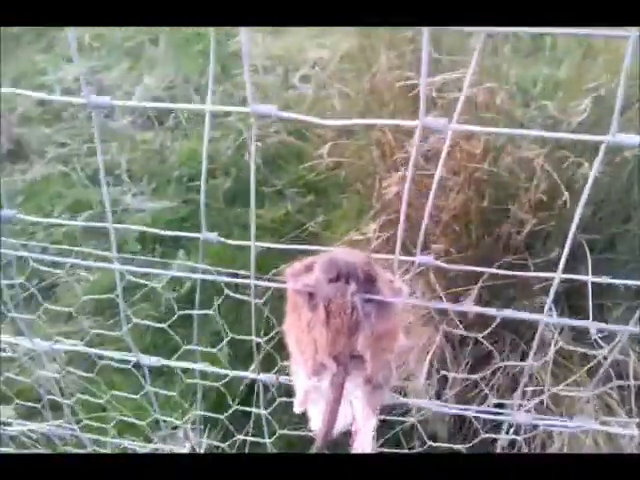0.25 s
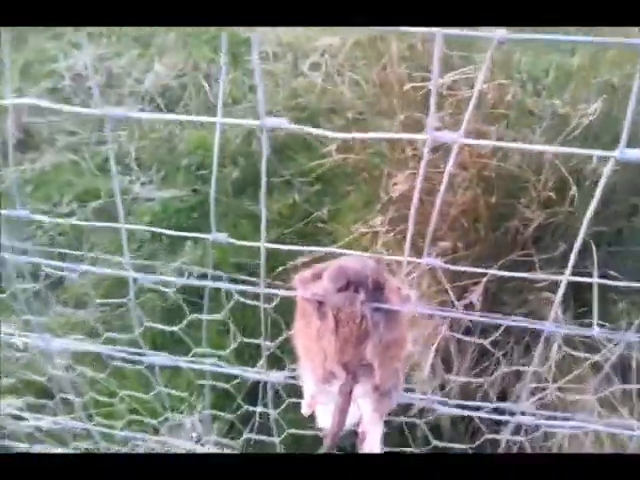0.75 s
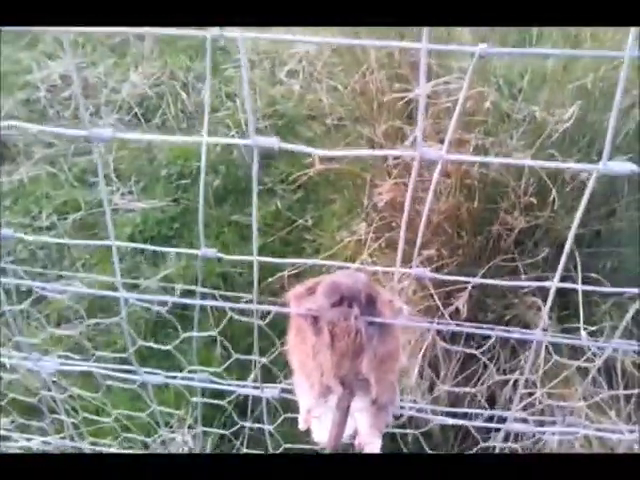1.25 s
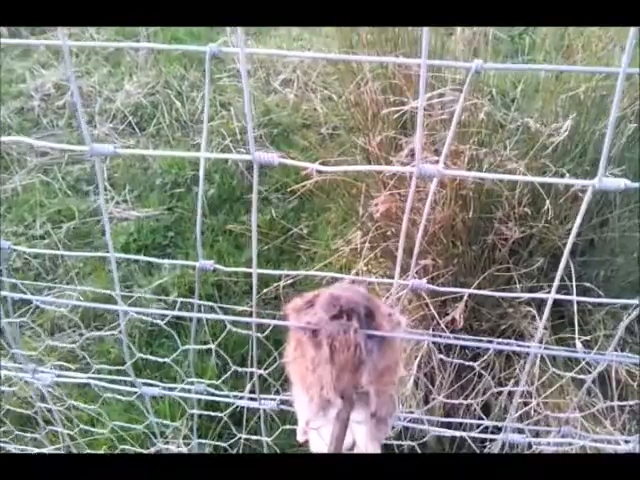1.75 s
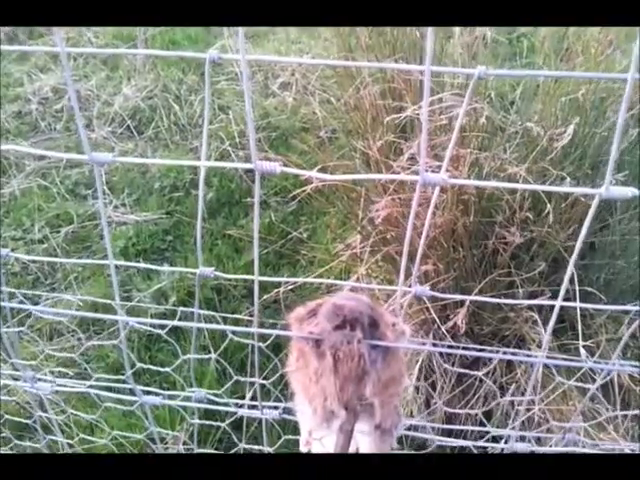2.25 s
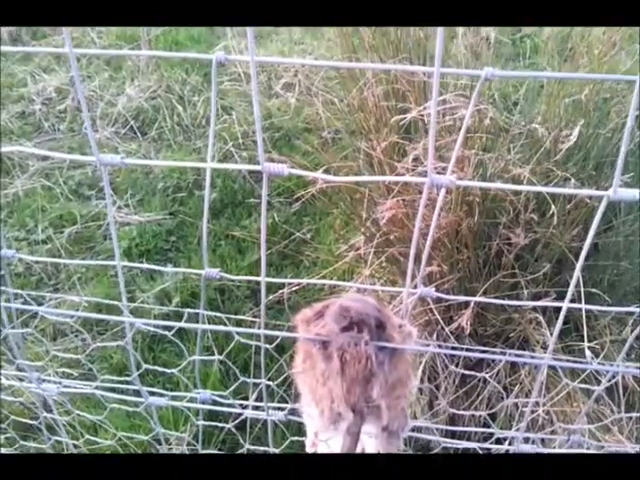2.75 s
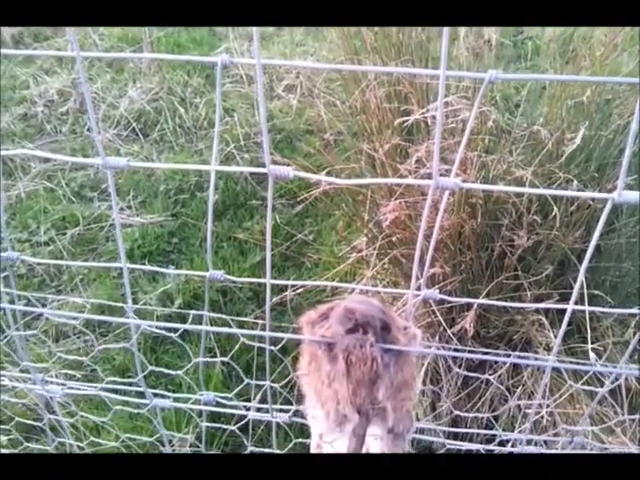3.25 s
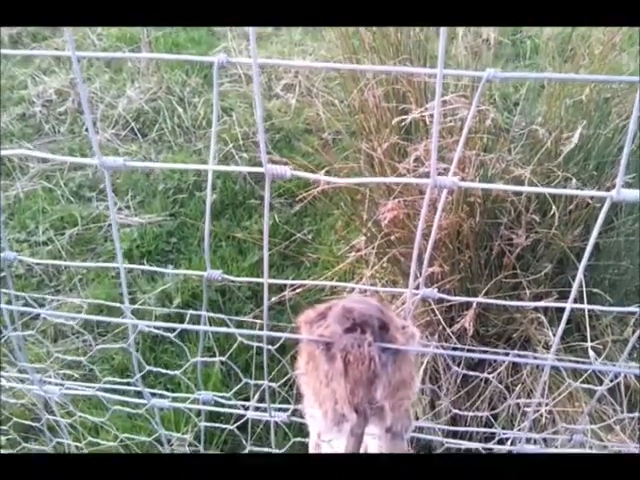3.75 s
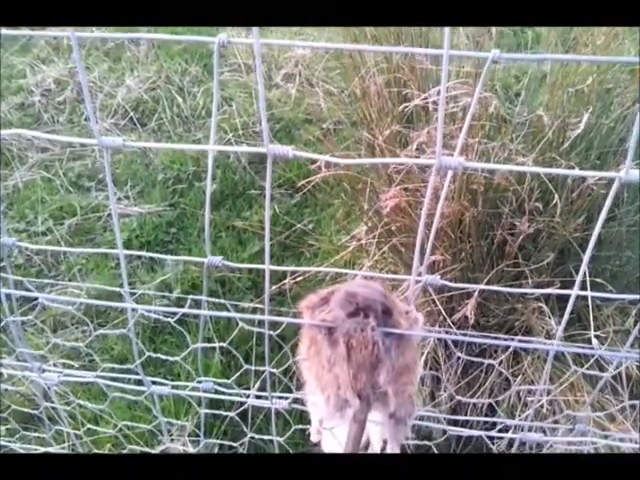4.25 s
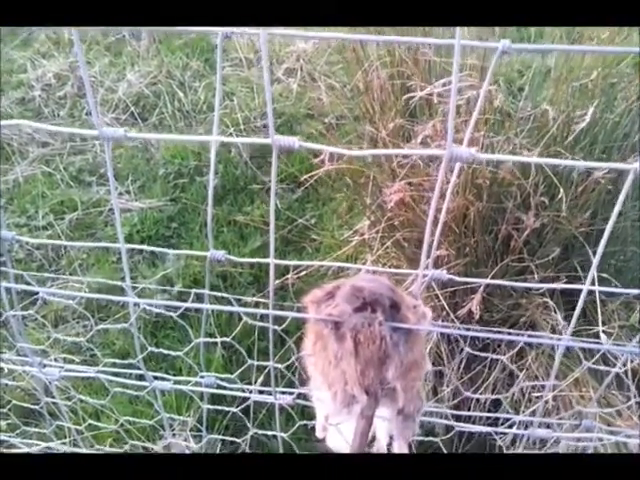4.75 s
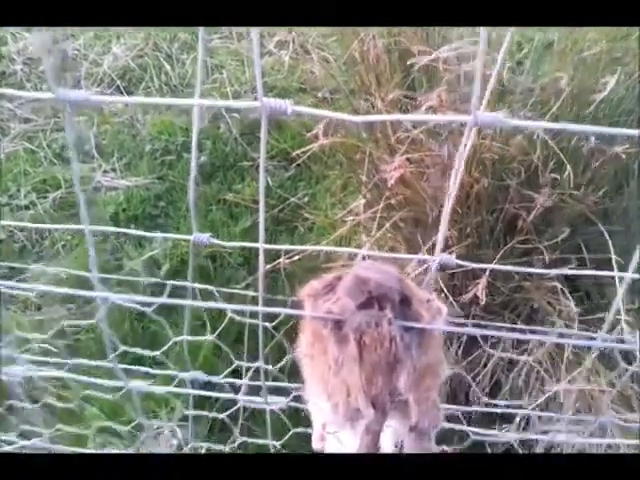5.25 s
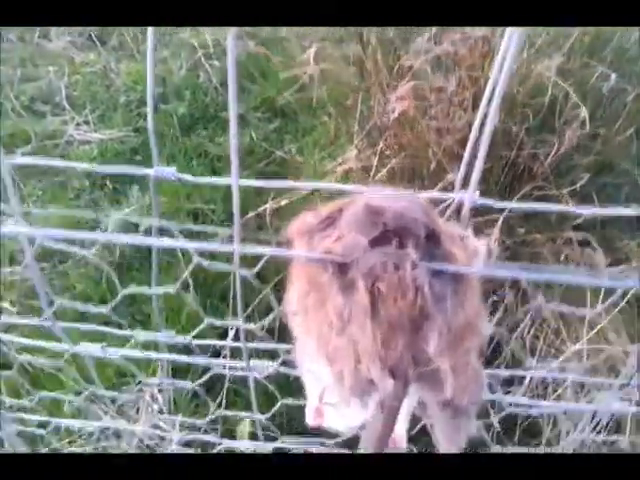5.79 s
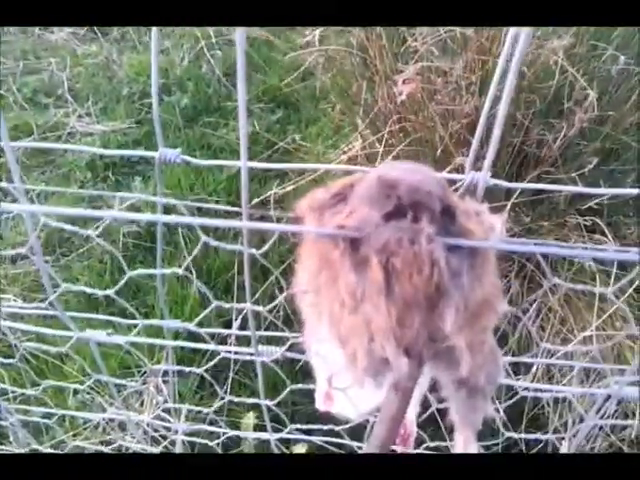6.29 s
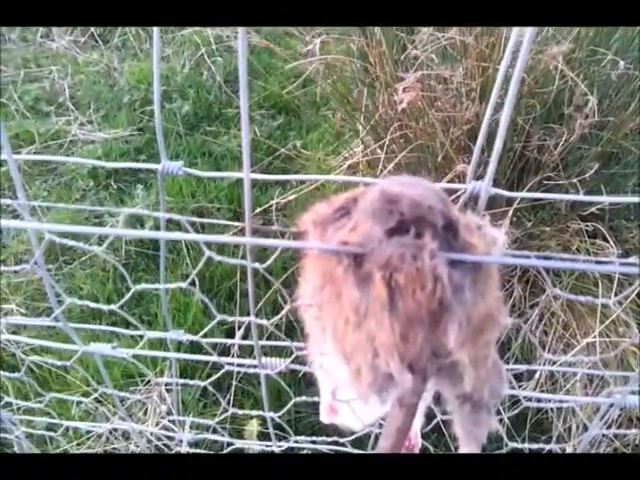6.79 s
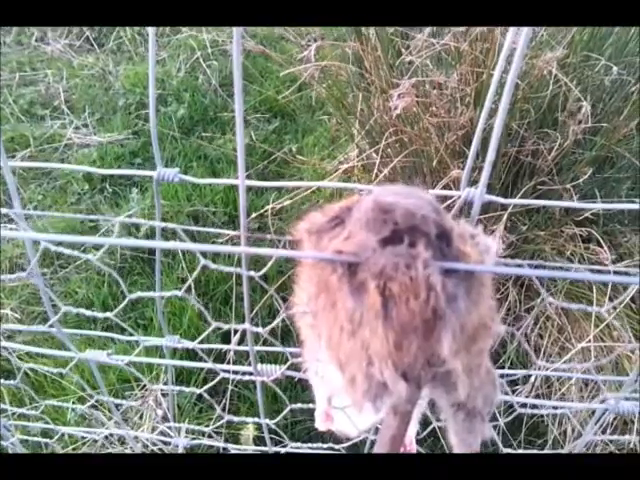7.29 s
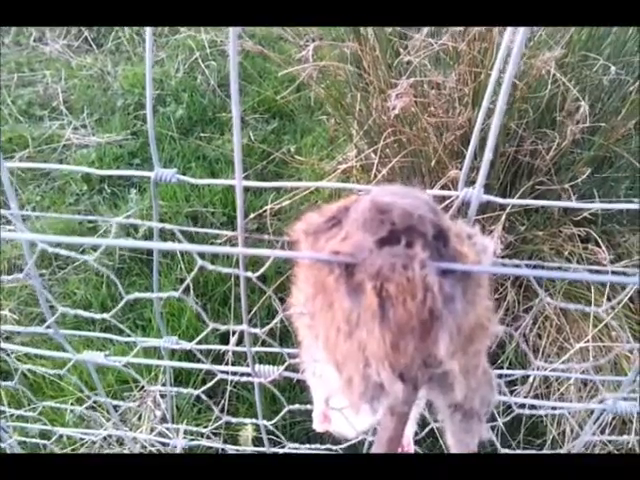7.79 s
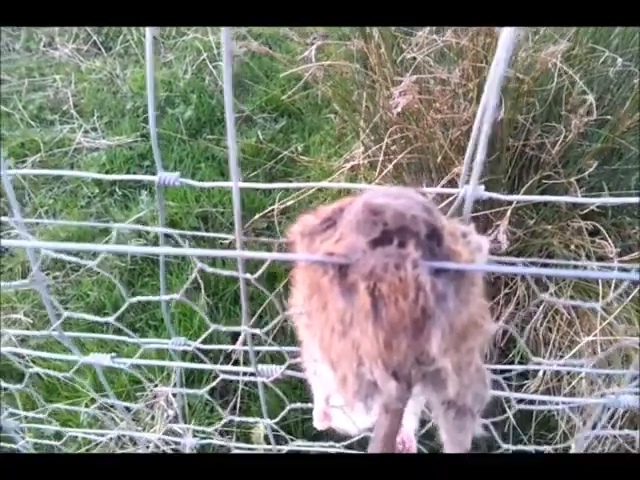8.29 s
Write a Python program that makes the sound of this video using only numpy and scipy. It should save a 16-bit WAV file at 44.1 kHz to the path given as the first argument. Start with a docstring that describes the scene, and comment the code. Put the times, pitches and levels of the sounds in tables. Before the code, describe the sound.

An electric fence snaps loudly five times, about every second and a half, over faint outdoor rumble, with grass rustling and a spell of wind buffeting.

```python
"""Electric fence snapping in a meadow

An electric fence arcs every second and a half, close to a small microphone whose input it overloads.
Each snap is shaped noise: a crackle, a ground echo, echoes off posts, and a low kick of the microphone.
Wind buffets the microphone port for a while: rumbling noise with short fluttering packets on top.
Grass rustles, mostly at the start, as grainy hiss with a few cracks.
Steady coloured noise makes the far rumble and hiss under it all."""
import sys
import numpy as np
from scipy import signal
from scipy.fft import rfft, irfft, next_fast_len
from scipy.io import wavfile
from scipy.ndimage import map_coordinates

SR = 44100
rng = np.random.default_rng(int(sys.argv[2]) if len(sys.argv) > 2 else 0)


def bounce(signal):
    """Save signal as a 16-bit WAV file at the path given by the first command-line argument."""
    frames = np.transpose(np.atleast_2d(signal))
    limited = np.clip(frames, -1, 1)
    pcm = np.round(limited * 32767).astype(np.int16)
    wavfile.write(sys.argv[1], SR, pcm)


N = 376173  # length in samples


def sparks():
    """Each arc is a sudden bang, scattered by wires, posts and meadow, that also jolts the diaphragm."""
    # the snaps; crackle levels are before the fades below, kick and swing are signed sizes, and
    # share_new says how far the surroundings' answer has changed:
    # start_s, high_crackle_db, low_crackle_db, loud_part_s, kick, swing_back, share_new (0-1)
    spark_rows = [(1.3754, -3, -9, 0.015, -0.16, 0.018, 0.033),
                  (2.8915, -5.5, -10.5, 0.014, -0.64, 0.092, 0.17),
                  (4.4032, -6.5, -10, .015, -0.85, 0.11, 0.27), (5.9222, -10, -8, 0.013, -0.4, .05, 0.8),
                  (7.4379, -5, -9, 0.013, 0.93, -0.13, 1)]
    # colour of the near crackle, treble and bass parts: pitch_hz, relative level_db (per Hz)
    near_high = [(3500, -56.5), (4400, -14), (5150, 0.5), (5350, -3.5), (5900, 0.5), (6150, -2.5),
                 (6380, 1), (7000, -7), (7600, -7), (9000, -20)]
    near_low = [(150, -29.5), (450, -13.5), (900, -12), (1400, -3.5), (1550, -3.5), (1880, 2), (2200, -9),
                (2450, -1), (2950, -7), (3330, -3), (3800, -9), (4400, -6), (5500, -60)]
    # smoother colours of the far scatter: pitch_hz, relative level_db (per Hz)
    far_high = [(3200, -40.5), (4300, -8.5), (5000, -2.5), (6400, -2), (7600, -6.5), (9000, -20)]
    far_low = [(150, -29.5), (500, -14), (1200, -5), (2000, -2), (3300, -4), (4300, -7.5), (5500, -50)]
    out = np.zeros(N + SR)
    t = np.arange(SR // 2) / SR

    def draw_surroundings():
        """Random scatter as noise: near and far, each with a high and a low part."""
        parts = ((near_high, near_low), (far_high, far_low))
        return np.array([[noise(colour, size=len(t)) for colour in part] for part in parts])

    def jolt(at_s):
        """A smooth bump of height 1, about a millisecond and a half wide."""
        return np.exp(-.5 * ((t - at_s) / 0.00063) ** 2)

    place = draw_surroundings()  # the surroundings answer every spark alike until the microphone moves
    posts = post_echoes(t)
    for start_s, high_db, low_db, loud_s, kick, swing, new in spark_rows:
        new = np.clip(new, 0, 1)
        scatter = np.sqrt(1 - new) * place + np.sqrt(new) * draw_surroundings()
        near = amp(high_db) * scatter[0, 0] + amp(low_db) * scatter[0, 1]
        # grass swallows some treble on the way
        far = amp(high_db - 4) * scatter[1, 0] + amp(low_db - 1.5) * scatter[1, 1]

        rise = 1 - np.exp(-t / 0.00038)
        # the dense near scatter ends
        stop = 1 / (1 + np.exp(np.clip((t - loud_s) / 0.002, -40, 40)))
        # the ground echo is a step up in gain after 2.8 ms
        ground = 1 + amp(-1.0) * (t > .0028)
        body = ground * amp(-1.5 - 60 * t / 0.068) * stop
        early = amp(-10 - 60 * t / 0.091)  # wires and stems further off
        meadow = amp(-25.0) * fading(far)
        snap = rise * (near * (body + early) + meadow) + posts * far

        # the diaphragm jumps and rebounds, then swings slowly the other way
        push = kick * (jolt(0.00092) - 0.2 * jolt(0.0043) + 0.25 * jolt(0.0039))
        back = swing * amp(-60 * t / 0.22) * (1 - np.exp(-(t / 0.0025) ** 2))
        out[round(start_s * SR):][:len(t)] += snap + push + back
    return out[:N]


def post_echoes(t):
    """Echoes as brief bumps of gain: the nearest post, the row beyond it, and six stakes at random."""
    # the row of posts beyond the nearest: delay_s
    row_delays_s = [.0457, .066, .0835, .1003, .1143]
    nearest_s, nearest_db = .0288, -19
    row_db = -30.5 - 3.5 * np.arange(len(row_delays_s))  # each post is 3.5 dB weaker
    stakes_s = rng.uniform(.04, .125, size=6)
    stakes_db = np.interp(stakes_s, row_delays_s, row_db) - 4  # thin stakes echo less than the posts
    delays_s = np.r_[nearest_s, row_delays_s, stakes_s]
    levels_db = np.r_[nearest_db, row_db, stakes_db]
    bumps = np.exp(-.5 * ((t - delays_s[:, None]) / .0006) ** 2)
    return amp(levels_db) @ bumps


def fading(x):
    """Scatter from posts and grass dies away at a different speed for each frequency."""
    # time to fall by 60 dB: pitch_hz, fade_s
    fade_times = [(500, .12), (1500, 0.22), (3500, .24), (6000, 0.26)]
    hz, t, z = signal.stft(x, SR, nperseg=128)
    fade_s = along(fade_times, hz)[:, None]
    return signal.istft(z * amp(-60 * t / fade_s), SR, nperseg=128)[1][:len(x)]


def wind():
    """Eddies flutter over the port in short steep-fronted packets, above a lumpy rumble."""
    # gusts on the port: start_s, level_db, hold_s
    gust_rows = [(1.794, -37.5, 0.16), (2.1, -42, 0.012), (2.19, -43.5, .01), (2.298, -41.5, 0.087),
                 (2.54, -31, 0.17), (2.802, -30.5, .02), (3.01, -39.5, 0.025), (3.265, -33, .02),
                 (3.672, -44, .07), (3.88, -45, 0.011)]
    # colour of the rumble: pitch_hz, relative level_db (per Hz)
    rumble_colour = [(12, -27), (20, -10), (70, 3.5), (144, -4), (276, -21.5), (412, -38.5), (536, -38.5),
                     (615, -47.5), (800, -48.5), (1040, -80.5), (1760, -120)]
    # the strongest eddies: centre_s, level_db (of the plain flutter at its peak), flutter_hz
    eddy_rows = [(1.784, -28, 64), (1.833, -26, 122), (1.862, -20.5, 89), (1.912, -30.5, 70),
                 (1.975, -35, 76), (2.534, -19, 98), (2.549, -8.5, 112), (2.573, -13.5, 74),
                 (2.602, -18.5, 209), (2.63, -23.5, 115), (2.679, -16, 103), (2.716, -24.5, 165),
                 (2.745, -20, 148), (2.798, -20.5, 178), (2.824, -18.5, 97), (3.008, -31, 118),
                 (3.04, -31.5, 77.5), (3.253, -27, 91), (3.739, -31, 70), (3.884, -33.5, 79)]
    # colour of an eddy breaking up: pitch_hz, relative level_db (per Hz)
    puff_colour = [(60, -31.5), (150, 7.5), (240, 3.5), (350, -10), (480, -25), (750, -40), (1100, -81)]
    rise_db_per_s, fall_db_per_s = 260, 120
    half_length_cycles = 0.69  # half length of a packet, in cycles of its flutter

    gusts = swells([(*gust, rise_db_per_s, fall_db_per_s) for gust in gust_rows])
    lumps = amp(3.5 * wobble(30))
    out = gusts * unit(lumps * noise(rumble_colour))

    t = np.arange(-SR // 8, SR // 8) / SR
    turns = rng.uniform(0, 2 * np.pi, len(eddy_rows))  # random starting phases
    for (centre_s, level_db, hz), turn in zip(eddy_rows, turns):
        shape = np.exp(-.5 * (t * hz / half_length_cycles) ** 2)
        phase = 2 * np.pi * hz * t + turn
        steep = 0.22 * shape ** 3 * np.sin(2 * phase)  # an overtone sharpens the front
        ragged = amp(-14) * shape * noise(puff_colour, size=len(t))  # noise roughens the crest
        packet = amp(level_db) * shape * (np.sin(phase) + (steep + ragged))
        out[round(centre_s * SR) - SR // 8:][:len(t)] += packet
    return out


def grass():
    """Brushed stems hiss in grains; a few of them crack as short bursts of the same noise."""
    # strokes through the grass: start_s, level_db, hold_s, rise_db_per_s, fall_db_per_s
    brush_rows = [(0, -56.5, .3, 100, 7), (.37, -50, 0.15, 85, 59), (.6, -44.5, .06, 150, 196),
                  (.72, -54, 0.043, 100, 59.5), (5.43, -56.5, .05, 25.5, 21.5)]
    # stems cracking: start_s, level_db, fade_s (time to fall by 60 dB)
    tick_rows = [(.3748, -43, .012), (.4085, -44, .02), (.5605, -35, .04), (.659, -43, .02),
                 (.8094, -52, .015), (.84, -36, .012), (.8518, -43, .012), (1.567, -50, .012)]
    # colour of the hiss: pitch_hz, relative level_db (per Hz)
    stem_colour = [(300, -18), (500, -4), (900, -4), (1430, -0.5), (2640, -1.5), (3320, -0.5), (4370, -6),
                   (6400, 0.5), (7600, -7.5), (9000, -14.5)]
    grains = amp(0.88 * wobble(40) + 1.8 * wobble(300))
    hiss = swells(brush_rows) * unit(grains * noise(stem_colour))

    burst = np.zeros(N)
    t = np.arange(SR // 20) / SR
    for start_s, level_db, fade_s in tick_rows:
        burst[round(start_s * SR):][:len(t)] += amp(level_db - 60 * t / fade_s)
    return hiss + burst * noise(stem_colour)


def air():
    """Far rumble and hiss: steady coloured noise that drifts a little in level."""
    # colour of the background: pitch_hz, relative level_db (per Hz)
    air_colour = [(12, -46), (20, -21), (42, 2), (75, -2.5), (101, 1), (123, -5.5), (154, -5), (316, -13),
                  (604, -16), (1240, -20), (1900, -22), (5800, -25.5), (6900, -30.5), (9000, -38)]
    level_db = -52 + .6 * wobble(1.1)
    return amp(level_db) * noise(air_colour)


def swells(rows):
    """Loudness curve of swells (start_s, level_db, hold_s, rise and fall in dB per s), added in power."""
    t = np.arange(N) / SR
    power = 0
    for start_s, level_db, hold_s, rise, fall in rows:
        before_s = np.clip(start_s - t, 0, None)
        after_s = np.clip(t - start_s - hold_s, 0, None)
        power = power + amp(level_db - rise * before_s - fall * after_s) ** 2
    return np.sqrt(power)


def noise(spectrum, size=N):
    """Random noise coloured by a spectrum and scaled to rms 1."""
    return unit(filtered(rng.standard_normal(size), lambda hz: amp(along(spectrum, hz))))


def wobble(rate):
    """A smooth random curve through random points, rate of them a second."""
    points = rng.standard_normal(int(N * rate / SR) + 4)
    return map_coordinates(points, [np.arange(N) * rate / SR])


def filtered(x, response):
    """Sound x with each frequency multiplied by response(hz)."""
    m = next_fast_len(x.shape[-1] + 8192)  # spare room at the end for ringing
    spectrum = rfft(x, m) * response(np.fft.rfftfreq(m, 1 / SR))
    return irfft(spectrum, m)[..., :x.shape[-1]]


def along(points, hz):
    """Values read between (Hz, value) points on a log frequency axis."""
    f, v = np.transpose(points)
    return np.interp(np.log(hz + 1), np.log(f + 1), v)


def amp(db):
    """Decibels to gain."""
    return 10 ** (np.asarray(db) / 20)


def unit(x):
    """Sound x scaled to rms 1."""
    return x / np.sqrt(np.mean(x ** 2) + 1e-20)


def clip(x, top, hardness):
    """A ceiling with a rounded knee: loud peaks are squashed towards top."""
    return x / (1 + np.abs(x / top) ** hardness) ** (1 / hardness)


def scene():
    """All sources added at one microphone."""
    return (sparks() + wind() + grass() + air())[None]


def record(dry):
    """The narrow-band input overloads; its overshoot clips again at full scale and sprays faint treble."""
    # frequency response of the input stage: pitch_hz, gain_db
    input_gain = [(20, 0.5), (7000, 0), (7500, -6), (7900, -21), (8300, -55), (8600, -89.5)]
    top_hz = 15800  # nothing passes above this; the fade is 400 Hz wide
    overloaded = clip(dry, top=.97, hardness=8)
    stage = filtered(overloaded, lambda hz: amp(along(input_gain, hz)))
    full = clip(stage, top=1.0, hardness=20)
    return filtered(full, lambda hz: np.clip((top_hz - hz) / 400, 0, 1))


dry = scene()
out = record(dry)
bounce(out)
```